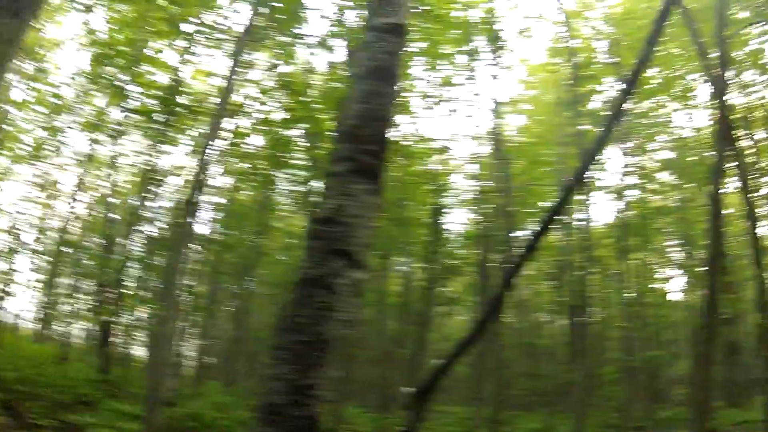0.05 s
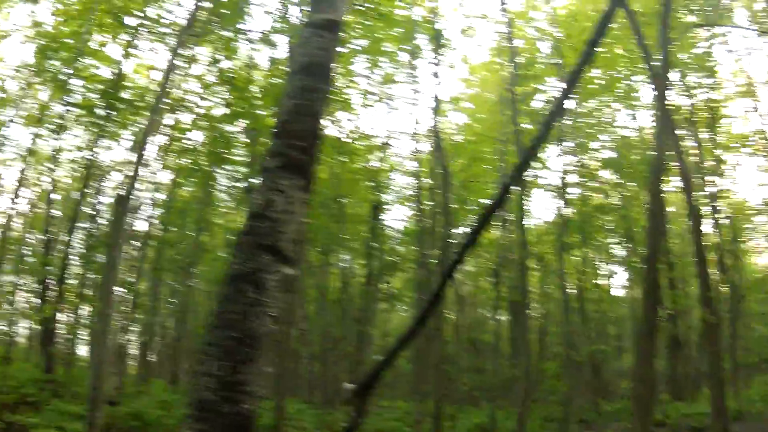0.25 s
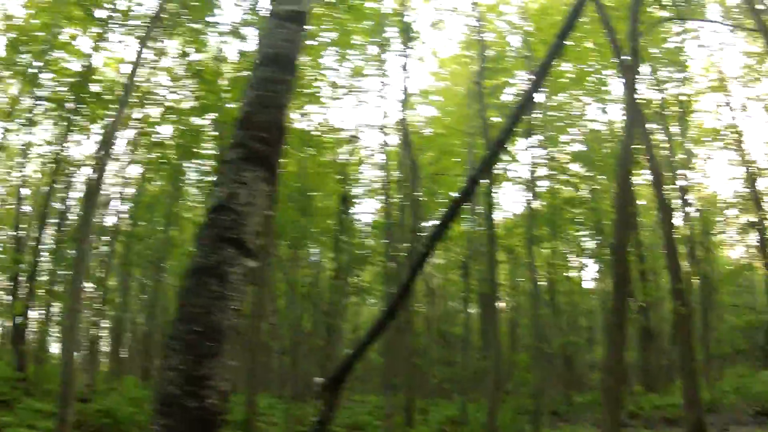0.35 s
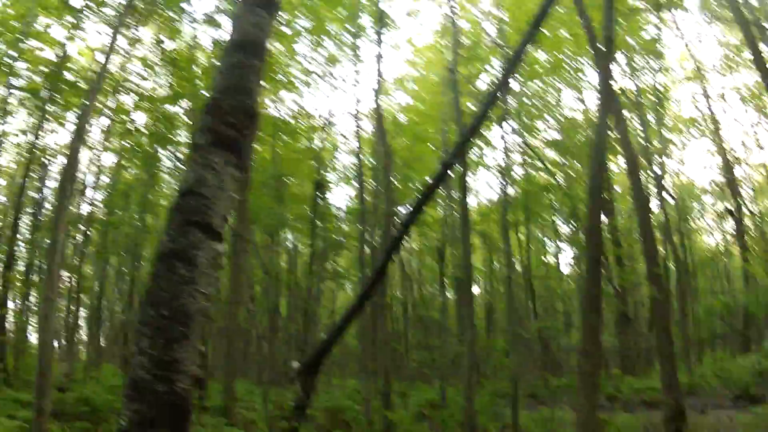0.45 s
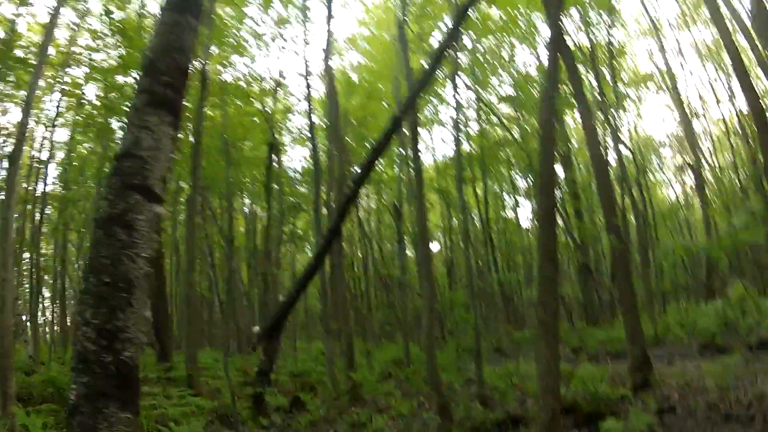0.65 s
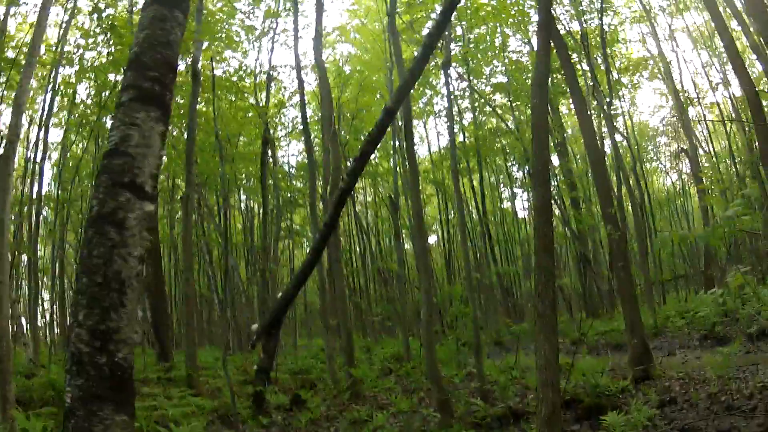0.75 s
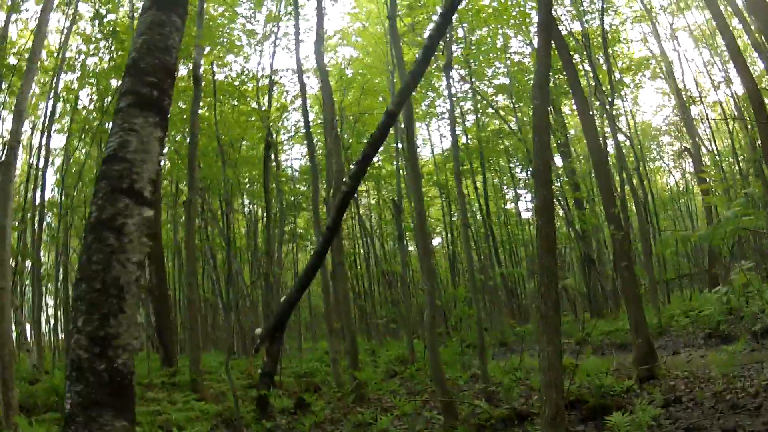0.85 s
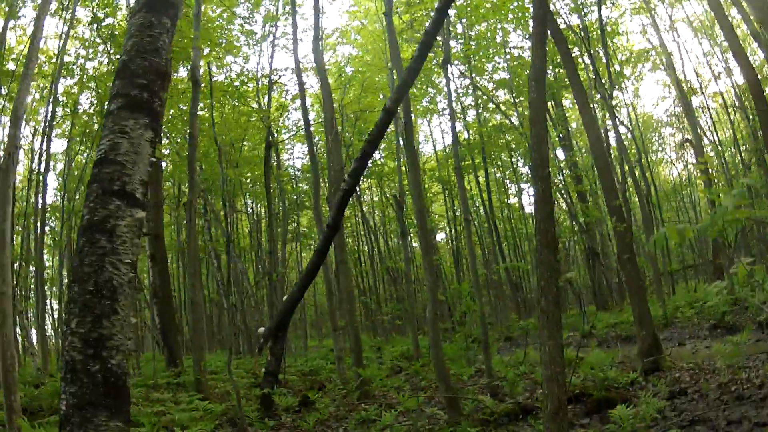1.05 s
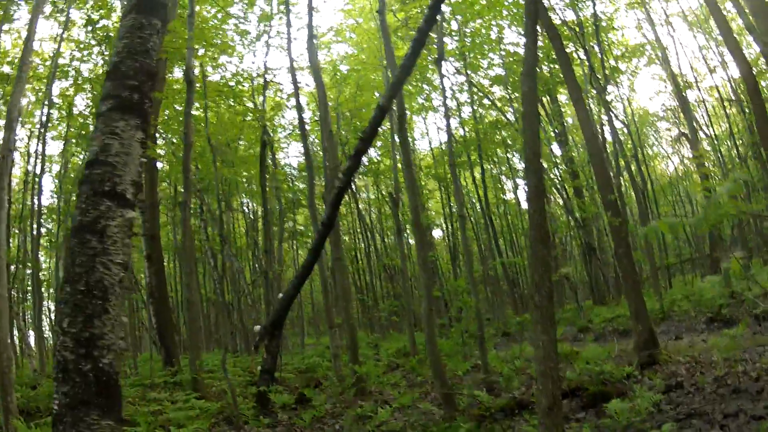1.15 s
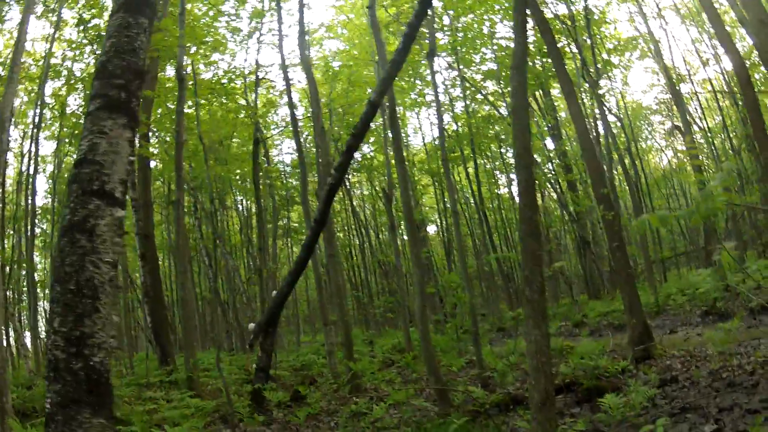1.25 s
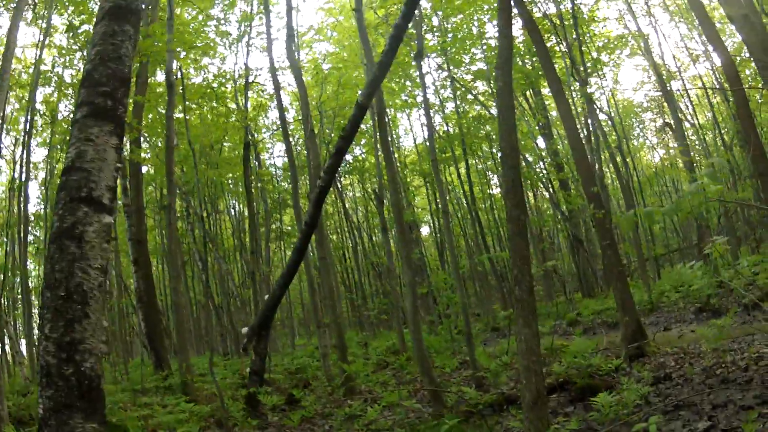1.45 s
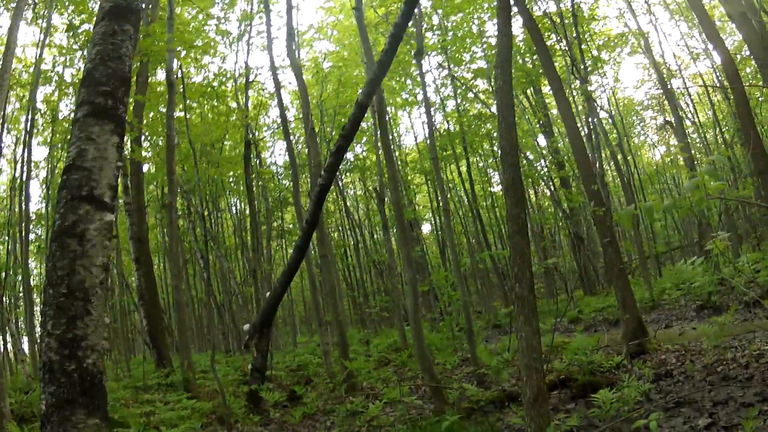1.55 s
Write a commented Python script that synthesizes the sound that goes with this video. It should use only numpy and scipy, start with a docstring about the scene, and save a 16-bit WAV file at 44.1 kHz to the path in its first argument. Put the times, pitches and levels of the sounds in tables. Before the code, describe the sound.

A turkey close by gives one short, raspy yelp that echoes briefly among the trees. A few soft bumps on the microphone, faint twig ticks and leaf rustles follow over the low rush of a quiet forest.

```python
"""A quiet wood, one microphone, a turkey close by. The bird gives one short yelp, a rough membrane tone
with air rasping through it, while the echo of the yelp before still hangs among the trunks.
A few soft handling bumps, twig ticks and two brief leaf rustles sit over a low rush and a faint hum.
The recorder holds each sample at a low rate, which mirrors the yelp into a thin metallic treble."""
import sys
import numpy as np
from scipy import signal
from scipy.fft import rfft, irfft
from scipy.io import wavfile
from scipy.ndimage import map_coordinates

SR = 44100
rng = np.random.default_rng(int(sys.argv[2]) if len(sys.argv) > 2 else 0)


def master_out(mix):
    """Clip the mix to full scale and print it as 16-bit PCM to the path in sys.argv[1]."""
    frames = np.transpose(np.atleast_2d(mix))
    ceiling = np.clip(frames, -1, 1)
    pcm = np.round(ceiling * 32767).astype(np.int16)
    wavfile.write(sys.argv[1], SR, pcm)


N = 70560


def yelp(t, pitch_ratio):
    """A slightly rough membrane tone: the fundamental speaks first and ends last, the octave dominates."""
    # The pitch drops in, sags and flicks up. Each row: time into the yelp in seconds, pitch in Hz.
    contour = [(0, 1147), (.003, 1213), (.0055, 972), (.015, 966), (.026, 921.4), (.044, 911.6),
               (.057, 930.6), (.068, 1025), (.081, 1212)]
    # The membrane's partials. Each row: harmonic number, level in dB, then start, attack, fade start
    # and release in seconds, mid-call dip in dB (negative swells).
    partials = [(1, -10.5, 0.00078, 0.0016, 0.079, 0.0055, -2),
                (2, 2.5, 0.00124, 0.013, 0.055, 0.024, -0.5), (3, -11.5, .003, .004, 0.0603, 0.019, -1.5),
                (4, -19.5, 0.00062, 0.0084, 0.0674, 0.0049, 22), (5, -37.5, 0, .006, .06, .01, -6)]
    # Air rasping through the call. Each row: frequency in Hz, level in dB.
    rasp_spectrum = [(300, -28), (800, -18), (1200, 9.5), (1600, -2), (2200, -9), (3300, -14), (4500, -6),
                     (5500, -31)]
    jitter, shimmer_db, rough_hz, fade_db_per_s = 0.0056, 0.16, 455.5, 68
    hz = pitch_ratio * np.interp(t, *np.array(contour).T) * (1 + jitter * drift(rough_hz))
    phase = 2 * np.pi * np.cumsum(hz) / SR
    mid_call = np.exp(-((t - 0.038) / 0.016) ** 2)
    tone, gates = 0, []
    for harmonic, db, start, attack, fade, release, dip_db in partials:
        gate = ramp((t - start) / attack) * (1 - ramp((t - fade) / release))
        gain = undb(db - dip_db * mid_call + shimmer_db * drift(rough_hz))
        tone += np.sqrt(2) * gate * gain * np.sin(harmonic * phase)
        gates.append(gate)
    airflow = np.mean(gates, axis=0) * (1 + .5 * np.sin(phase))
    rasp = undb(-19) * noise(rasp_spectrum) * airflow
    return (tone + rasp) * undb(-fade_db_per_s * t)


def trunk_echo(t):
    """Impulse response of the wood: the ground reflects, near trunks scatter, far ones leave a wash."""
    # Tone of the echo. Each row: frequency in Hz, gain in dB.
    echo_spectrum = [(300, -2.5), (950, -22.5), (1400, -12), (1870, -1), (2200, 4.5), (2800, -5.5),
                     (4000, -10), (5000, -19)]
    ground_s, scatter_delay_s, returns_per_s = 0.015, 0.013, 1400
    ground = undb(-21) * np.sinc((t - ground_s) * SR)
    scatter = rng.standard_normal(N) * (rng.random(N) < returns_per_s / SR)
    near = undb(-14.5) * unit(scatter * decay(t - scatter_delay_s, t60=0.086))
    far = undb(-23) * unit(rng.standard_normal(N) * decay(t - scatter_delay_s, t60=0.75))
    return colour(ground + (near + far) / np.sqrt(N), echo_spectrum)


def turkey(t):
    """The bird close by, each yelp with its echo; of the one before time zero only the echo is heard."""
    # The yelps. Each row: start in seconds, gain in dB, pitch ratio.
    yelps = [(-0.17, -7, 0.96), (0.193, -15.5, 1.0)]
    out = 0
    for start, db, pitch_ratio in yelps:
        call = undb(db) * yelp(t, pitch_ratio)
        echo = signal.fftconvolve(call, trunk_echo(t))[:N]
        age = t - round(start * SR) / SR
        out += np.interp(age, t, call + echo, left=0, right=0)
    return out


def handling_bumps(t):
    """Dull bumps against the recorder: a push into a low ring, with a knock clearest in the harder ones."""
    # Each row: start in seconds, level in dB, ring in Hz, contact in seconds, knock re the ring in dB.
    bumps = [(0.341, -25, 255, 0.0045, -16), (0.4965, -24, 244.7, 0.0011, -5),
             (0.542, -31, 130, 0.0051, -14), (1.089, -44, 105, 0.007, -14), (1.399, -35, 230, .002, -6)]
    knock_hz = 640
    out = 0
    for start, db, ring_hz, contact, knock_db in bumps:
        age = t - start
        ring = decay(age, t60=0.032) * np.sin(2 * np.pi * ring_hz * age)
        knock = decay(age, t60=0.021) * np.sin(2 * np.pi * knock_hz * age)
        out += undb(db) * ramp(age / contact) * (ring - undb(knock_db) * knock)
    return out


def twig_ticks(t):
    """Twigs tick faintly, each a bright burst of noise that dies at once."""
    # The ticks. Each row: start in seconds, gain in dB.
    ticks = [(0.497, -45), (0.852, -52), (0.916, -50), (1.268, -57), (1.395, -41.5)]
    # Tone of a twig. Each row: frequency in Hz, level in dB.
    twig_spectrum = [(800, -12), (2000, -7), (3000, 8), (4000, -6.5), (5500, -17)]
    envelope = sum(undb(db) * decay(t - start, t60=0.016) for start, db in ticks)
    return envelope * noise(twig_spectrum) / 2


def leaf_rustles(t):
    """Dry leaves rustle in small grains over a low scuff."""
    # The rustles. Each row: start and length in seconds, leaf level and scuff level in dB.
    rustles = [(0.71, 0.14, -59.5, -72), (1.368, 0.11, -56, -48.5)]
    # Tone of the leaves and of the scuff. Each row: frequency in Hz, level in dB.
    leaf_spectrum = [(500, -10), (1500, -6), (2800, 0), (4200, -3), (5600, -1.5)]
    scuff_spectrum = [(60, -12), (150, -18), (280, 0.5), (600, 6.5), (1200, -36), (3000, -22.5)]
    grains = rng.standard_normal(N) * undb(3.7 * drift(rate_hz=900))
    leaves = unit(colour(grains, leaf_spectrum))
    scuff = noise(scuff_spectrum)
    out = 0
    for start, length, leaf_db, scuff_db in rustles:
        swell = np.sin(np.pi * np.clip((t - start) / length, 0, 1))
        out += swell * (undb(leaf_db) * leaves + undb(scuff_db) * scuff)
    return out


def background(t):
    """The low, slowly easing rush of the wood with a faint wavering hum."""
    # The rush. Each row: frequency in Hz, level in dB.
    rush_spectrum = [(15, -12), (25, -5), (66, -1.5), (130, -5.5), (220, -6), (290, -11.5), (370, -12.5),
                     (470, -9.5), (620, -6), (780, -17), (930, -14), (1150, -22), (2100, -25.5),
                     (3300, -36), (4500, -39), (5800, -38)]
    # Tones of the hum. Each row: frequency in Hz, rms level in dB.
    hum_tones = [(226, -63), (465, -60), (570, -64), (620, -62.5)]
    rush_db, ease_db_per_s = -44, 2.26
    rush = noise(rush_spectrum) * undb(rush_db - ease_db_per_s * t)
    hum = 0
    for hz, db in hum_tones:
        gain = undb(db + 3.1 * drift(rate_hz=8.67))
        wavering_hz = hz * (1 + 0.01269 * drift(rate_hz=14))
        hum += np.sqrt(2) * gain * np.sin(2 * np.pi * np.cumsum(wavering_hz) / SR)
    return rush + hum


def undb(db):
    """Decibels to gain."""
    return 10 ** (np.asarray(db) / 20)


def unit(x):
    """Scale to rms 1."""
    return x / np.sqrt(np.mean(x ** 2) + 1e-20)


def colour(x, spectrum):
    """Filter by a spectrum of (Hz, dB) points."""
    hz, db = np.array(spectrum, float).T
    bin_hz = np.maximum(np.fft.rfftfreq(2 * len(x), 1 / SR), 1)
    gain = undb(np.interp(np.log(bin_hz), np.log(hz), db))
    return irfft(rfft(x, 2 * len(x)) * gain)[:len(x)]


def noise(spectrum):
    """Coloured noise of rms 1."""
    return unit(colour(rng.standard_normal(N), spectrum))


def drift(rate_hz):
    """Smooth random drift of rms 1."""
    position = np.arange(N) * rate_hz / SR
    return unit(map_coordinates(rng.standard_normal(4096), [position], order=3, mode="wrap"))


def ramp(progress):
    """Smooth step from 0 to 1."""
    return np.sin(np.pi / 2 * np.clip(progress, 0, 1)) ** 2


def decay(age, t60):
    """Starts at age 0 and falls 60 dB in t60 seconds."""
    return (age >= 0) * np.exp(-np.log(1000) * np.maximum(age, 0) / t60)


def scene():
    """Everything reaches one microphone, the same in both channels."""
    t = np.arange(N) / SR
    microphone = turkey(t) + handling_bumps(t) + twig_ticks(t) + leaf_rustles(t) + background(t)
    return np.tile(microphone, (2, 1))


def record(dry):
    """The recorder samples at a low rate and holds in steps, mirroring the spectrum up; the top is cut."""
    band_hz, hold_hz, repeats, top_hz = 5550, 12000, 4, 15400
    band = signal.sosfiltfilt(signal.butter(12, band_hz, fs=SR, output="sos"), dry)
    samples = signal.resample_poly(band, hold_hz, SR, axis=1)
    steps = np.repeat(samples, repeats, axis=1)
    held = signal.resample_poly(steps, SR, hold_hz * repeats, axis=1)[:, :N]
    return signal.sosfilt(signal.ellip(8, .2, 70, top_hz, fs=SR, output="sos"), held)


dry = scene()
out = record(dry)
master_out(out)
```